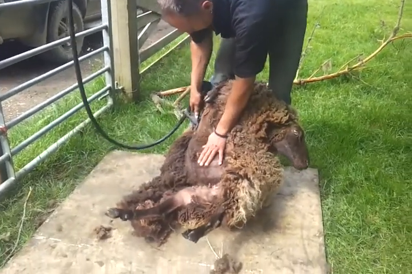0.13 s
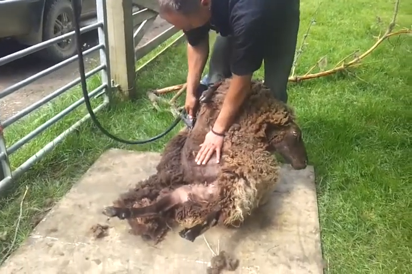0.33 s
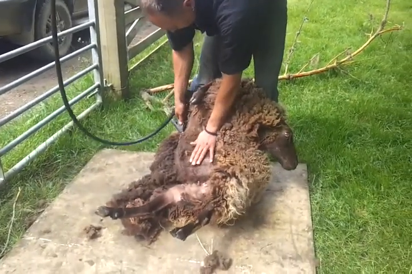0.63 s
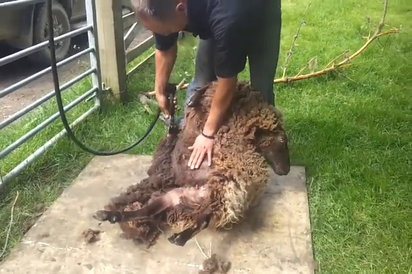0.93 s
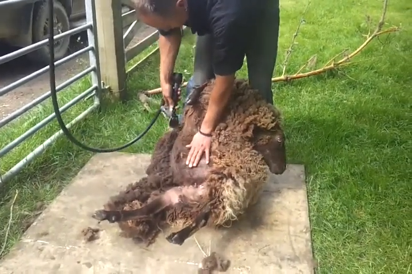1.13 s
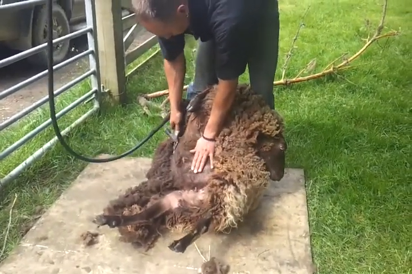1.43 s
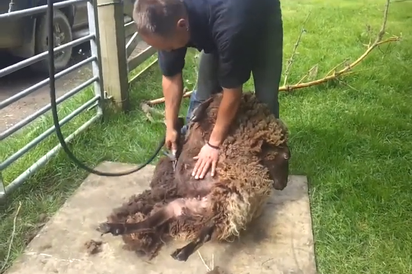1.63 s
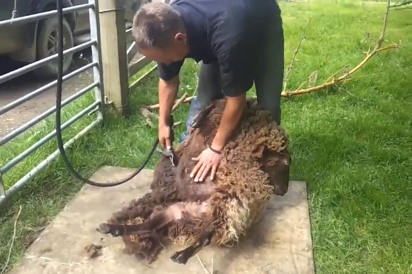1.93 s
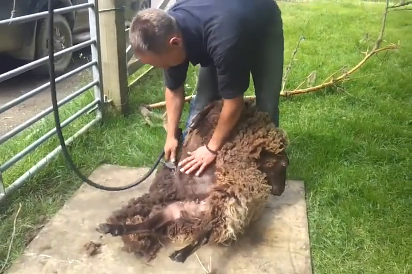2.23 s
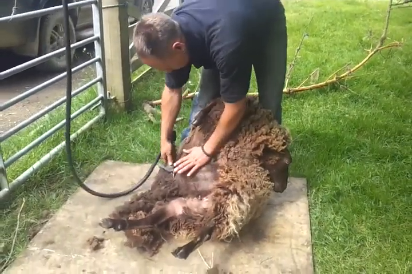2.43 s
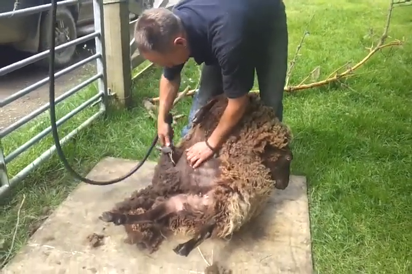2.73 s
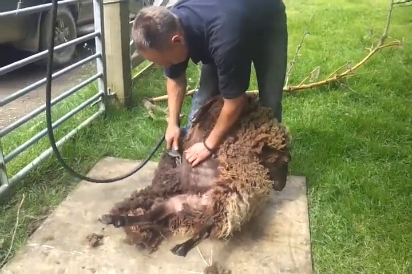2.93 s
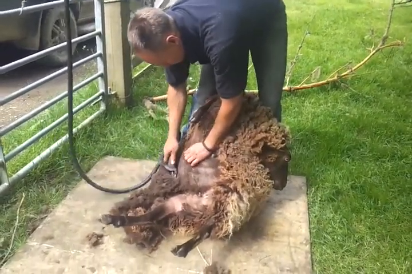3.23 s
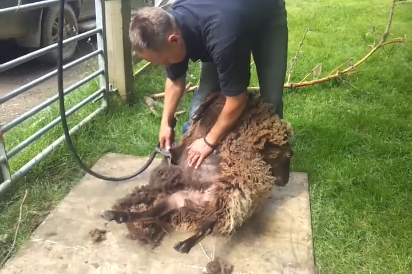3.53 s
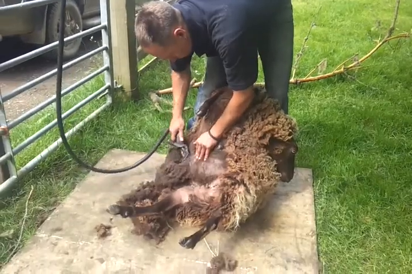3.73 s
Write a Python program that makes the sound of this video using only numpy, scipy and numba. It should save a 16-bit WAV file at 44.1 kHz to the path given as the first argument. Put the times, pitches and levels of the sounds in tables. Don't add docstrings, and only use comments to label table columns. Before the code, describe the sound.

A powered shearing handpiece buzzes nonstop a few metres away in an open paddock, harsh and metallic, with shifting ringing overtones, small jolts and brief low wind puffs on the stereo microphone.

```python
import sys
import numpy as np
from scipy import signal
from scipy.fft import rfft, irfft, next_fast_len
from scipy.io import wavfile
from scipy.ndimage import uniform_filter1d
from numba import njit

SR = 44100
rng = np.random.default_rng(int(sys.argv[2]) if len(sys.argv) > 2 else 0)


def volts_from_db(level):
    exponent = np.asarray(level, float) / 20
    return 10 ** exponent


def generate_wav(sig):
    pcm = np.round(np.clip(np.atleast_2d(sig).T, -1, 1) * 32767).astype(np.int16)
    wavfile.write(sys.argv[1], SR, pcm)


N = 170667
CRANK_HZ, FIRST_KNOCK_S, TEETH = 53.82, .0078, 8


def unit(x):
    return x / np.sqrt(np.mean(x ** 2))


def on_log(hz, table):
    table = np.array(table)
    return np.interp(np.log(np.maximum(hz, 1)), np.log(table[:, 0]), table[:, 1])


def shaped(x, gain):
    size = next_fast_len(N)
    hz = np.arange(size // 2 + 1) * SR / size
    return irfft(rfft(x, size) * gain(hz), size)[:N]


@njit
def resonator(x, hz, width):
    y, band, low = np.empty(len(x)), 0., 0.
    for i in range(len(x)):
        g, damping = np.tan(np.pi * hz[i] / 44100), width / hz[i]
        v = (band + g * (x[i] - low)) / (1 + g * (g + damping))
        band, low, y[i] = 2 * v - band, low + 2 * g * v, damping * v
    return y


def walk(rate_hz):
    hold = int(SR / rate_hz)
    steps = np.repeat(rng.standard_normal(N // hold + 1), hold)
    return 1.5 * uniform_filter1d(uniform_filter1d(steps, hold), hold)[:N]


def bursts(t, table):
    edge_s, gust_db = 0.0061, 2.5
    envelope = 0
    for start, length, db in table:
        inside = np.minimum(t - start, start + length - t)
        envelope = envelope + volts_from_db(db) * np.clip(inside / edge_s + .5, 0, 1)
    return rng.standard_normal(N) * envelope * volts_from_db(gust_db * walk(40))


# frequency_hz [Hz], density_db [dB per Hz]
WIND_COLOUR = [(20, -52), (70, -15.5), (184, -2.5), (300, -4.5), (374, -6), (450, -5), (700, -25),
               (1000, -55)]
# start_s [s], length_s [s], level_db [dB]
PUFFS_LEFT = [(.08, 0.096, -45), (.22, 0.18, -43.5), (.5, 0.31, -47), (.75, 0.079, -33.5),
              (.83, 0.062, -41), (.89, 0.17, -45.5), (1.2, 0.22, -49), (1.52, 0.039, -39),
              (1.68, 0.075, -47), (1.8, 0.14, -47), (2.27, 0.026, -51), (2.37, 0.059, -43),
              (3.41, 0.02, -42)]
# start_s [s], length_s [s], level_db [dB]
PUFFS_RIGHT = [(0.03, 0.29, -41), (0.35, 0.054, -34.5), (0.424, 0.18, -49.5), (0.573, 0.14, -38.5),
               (0.742, 0.15, -45), (0.8, 0.016, -34), (0.842, 0.0355, -31), (0.9, 0.13, -43.5),
               (1.177, 0.12, -39.5), (1.27, 0.062, -42), (1.344, 0.062, -45.5), (1.669, 0.04, -39.5),
               (1.749, 0.02, -32), (1.779, 0.22, -48), (2.097, 0.05, -46), (2.486, .06, -46),
               (2.614, .04, -53), (2.68, 0.08, -55), (3.033, 0.037, -51), (3.113, 0.085, -45.5),
               (3.39, 0.018, -48), (3.707, 0.047, -44)]


def wind(t):
    breeze = (0, 4, -75)
    colour = lambda f: volts_from_db(on_log(f, WIND_COLOUR) + 32) / (1 + (f / 600) ** 6)
    return np.array([shaped(bursts(t, [*puffs, breeze]), colour) for puffs in (PUFFS_LEFT, PUFFS_RIGHT)])


# start_s [s], length_s [s], level_db [dB]
SHIFTS = [
    (2.419, 0.168, -34.5),
    (3.196, 0.16, -34.5),
    (3.353, 0.084, -39.5),
]


def board(t):
    board_hz, width_hz = 244, 180.
    x = bursts(t, SHIFTS)
    for _ in range(3):
        x = resonator(x, board_hz + 0 * t, width_hz)
    return volts_from_db(24.5) * x


def knocks(turn):
    mean_db, scatter_db, length_turns = -4, 3, 0.12
    size = volts_from_db(mean_db + scatter_db * rng.standard_normal(int(turn[-1]) + 3))
    nearest = np.round(turn)
    return size[nearest.astype(int)] * np.exp(-((turn - nearest) / length_turns) ** 2)


def grit():
    contact_db, repeat = 1.55, 0.22
    x = rng.standard_normal(N) * volts_from_db(contact_db * rng.exponential(size=N))
    lag = round(SR / CRANK_HZ)
    turns = np.pad(x, (0, -N % lag)).reshape(-1, lag)
    return unit(signal.lfilter([1], [1, -repeat], turns, axis=0).ravel()[:N])


# start_s [s], peak_db [dB]
JOLTS = [(1.089, -5), (1.881, -9), (1.989, -13), (2.084, -4), (2.141, -1.5), (2.518, -11), (3.217, -19),
         (3.32, -2), (3.386, -7), (3.405, -1), (3.642, -5), (3.696, -4)]


def jolts(t):
    rise_s = 0.0026
    return 1 + sum(volts_from_db(db + 0.5) * np.exp(-((t - start - rise_s) / rise_s) ** 2) for start, db in JOLTS)


# frequency_hz [Hz], width_hz [Hz], level_db [dB]
BARREL = [(252.6, 28, -8.5), (467, 74, -0.5), (554.4, 48, 3.5), (639.5, 47, 1.5), (718.4, 47, 2),
          (898, 52, 0), (1123, 98, -3.5), (1356, 40, -7), (1444, 37, -11.5), (1720, 136, -0.5)]


def barrel(t, knock):
    push = grit() * (knock + volts_from_db(-5))
    total = 0
    for k, (hz, width, db) in enumerate(BARREL):
        total = total + (-1) ** k * volts_from_db(db) * unit(resonator(push, hz + 0 * t, 1. * width))
    return unit(total)


# once_db [dB], once_peak_turns [turns], twice_db [dB], twice_peak_turns [turns]
THROB = [
    (1.15, 0.19, 1.1, 0.63),
    (4.8, 0.37, 4.5, 0.1),
    (3.5, .0, 1, 0.64),
    (4.6, 0.35, 0, .0),
    (2.5, 0, 3, 0.46),
    (2, 0.74, -0.5, 0),
]


def throbs(turn):
    teeth = 1 + .06 * np.cos(2 * np.pi * TEETH * turn)
    return [teeth * volts_from_db(once * np.cos(2 * np.pi * (turn - p)) + twice * np.cos(4 * np.pi * (turn - q)))
            for once, p, twice, q in THROB]


# frequency_hz [Hz], density_db [dB per Hz]
SCRAPE_COLOUR = [(240, -19), (350, -34), (600, -15.5), (2000, -12.5), (3400, -7.5), (6600, -8),
                 (12500, -11), (14500, -20.5)]


def scrape(throb):
    return unit(shaped(grit() * throb, lambda f: volts_from_db(on_log(f, SCRAPE_COLOUR))))


def ring(t, x, hz, width_hz):
    hz = hz + 0 * t
    return unit(resonator(resonator(x, hz, width_hz), hz, width_hz))


def blade_rings(t, throb, hold, sway):
    comb_hz, comb_db, fork_db, cutter_db, heel_db, tip_db, grip_db = hold
    _, comb_throb, fork_throb, cutter_throb, tip_throb, grip_throb = throb
    blade = grit()
    comb = ring(t, blade * comb_throb ** 1.6, comb_hz, 330.)
    heel = ring(t, blade * comb_throb, 2627, 490.)
    grip = ring(t, blade * grip_throb, 1600, 510.)
    fork_hz = 5160 - 350 * np.clip((t - 3.4) / .3, 0, 1)
    patchy_db = 1.6
    fork_level = volts_from_db(-15.5 + fork_db + sway[2] + patchy_db * walk(6.9))
    fork = ring(t, blade * fork_throb, fork_hz, 700.)
    cutter = ring(t, blade * cutter_throb, 6840 * (1 + 0.024 * walk(2.83)), 1300.)
    tip_level = volts_from_db(-12.5 + tip_db + sway[4] + patchy_db * walk(20))
    tips = ring(t, blade * tip_throb, 7940 * (1 + 0.026 * walk(3.9)), 700.)
    return (volts_from_db(-10.5 + comb_db + sway[1]) * comb
            - volts_from_db(-18 + heel_db + sway[1]) * heel
            + volts_from_db(-25 + grip_db + sway[2]) * grip
            - fork_level * fork
            + volts_from_db(-13 + cutter_db + sway[3]) * cutter
            + tip_level * tips)


# comb_db, fork_db, cutter_db, heel_db, tip_db, grip_db
HAND = [(0, -19.5, 2880, -5, -9, 5, 5, 6, -14), (.2, -20.5, 2930, 2, -7, 6, -2, 3, 11.5),
        (.42, -19.5, 2900, 2.5, -2, 8, 1, 6.5, 12), (.65, -20.5, 3120, 0.5, 0, 8, 2, -3, 7),
        (.82, -19.5, 3260, 3.5, -3, -3, 5, 0, 6), (1.05, -19.5, 3270, -1.5, 6.5, 8, -1, -4, 0),
        (1.25, -20.5, 3220, 5, 3, 3.5, 8, -2, 2), (1.45, -20, 3160, 4, -12, 0, 8, 0.5, 8),
        (1.75, -19, 3250, -1, -3, 3, 2, -2, -8), (2.0, -20.5, 3230, -5.5, 0, 1, -7, 2, -2),
        (2.3, -19.5, 3180, -9, -5, -7, -5, 3, -7), (2.41, -22, 3220, -7, 3, 2, -3, 0, 3),
        (2.5, -18.5, 3180, -11, 3, -6, 2, 6, -5), (2.68, -21, 3180, 1, -2, -7, 2.5, 6, -19),
        (2.8, -20, 3300, -13, -8, -3, -14, 0, 1), (3.05, -20, 3330, -19, 8, 4, -11, -1, -10),
        (3.3, -20, 3320, -9, 3.5, -8, -10, -1, 10), (3.55, -19.5, 3260, -12, 0, 8, -5, 3, -1),
        (3.7, -19.5, 3340, -13, 8.5, -8, 0, 1, -11), (3.87, -19, 3340, -13, 6.5, -13, 1, 1, 1)]


def handpiece(t, turn, knock, sway):
    times, *columns = np.array(HAND).T
    level_db, *hold = [np.interp(t, times, column) for column in columns]
    throb = throbs(turn)
    steel = scrape(throb[0]) * volts_from_db(sway[0]) + blade_rings(t, throb, hold, sway)
    barrel_level = volts_from_db(-9 - 20.5 + 0.3 * (level_db + 21))
    effort = jolts(t)
    return volts_from_db(level_db) * effort * steel + barrel_level * effort ** 1.69 * barrel(t, knock)


# frequency_hz [Hz], difference_db [dB]
LEAN = [(300, 0), (1300, -0.5), (2400, 1), (4400, 4), (6400, 11), (8200, 5), (9300, 2.5), (13000, -5)]
# frequency_hz [Hz], share [0-1]
COMMON = [(300, 0.81), (700, 0.88), (1200, 0.54), (2000, 0.42), (3000, 0.81), (5500, 0.63), (7800, 0.21),
          (12000, 0.4)]


def hollow(f):
    notch = 1 - 0.35 * np.exp(-((f - 343) / 30) ** 2)
    return notch / (1 + (215 / (f + 1)) ** 14)


def at_ports(common, left, right):
    lag_s, left_top_hz = 6.5e-5, 13170
    share = lambda f: np.clip(on_log(f, COMMON), 0, 1)
    ports = []
    for side, own in ((0.91, left), (-0.7, right)):
        roll_off = lambda f: 1 + (side > 0) * (f / left_top_hz) ** 60
        lean = lambda f: volts_from_db(side * on_log(f, LEAN) / 2) / roll_off(f) * hollow(f)
        late = lambda f: np.exp(-1j * np.pi * f * side * lag_s)
        direct = shaped(common, lambda f: lean(f) * late(f) * np.sqrt(share(f)))
        scattered = shaped(own, lambda f: lean(f) * np.sqrt(1 - share(f)))
        ports.append(direct + scattered)
    return np.array(ports)


def scene():
    t = np.arange(N) / SR
    turn = (t - FIRST_KNOCK_S) * CRANK_HZ + 1
    knock = knocks(turn + 0.087) + volts_from_db(-5) * knocks(turn + 1 - 0.646)
    flicker_db = .3 * walk(30.24)
    sway = [flicker_db + .6 * walk(10.02) for _ in range(5)]
    common, left, right = (handpiece(t, turn, knock, sway) for _ in range(3))
    return volts_from_db(1.5) * at_ports(common, left, right) + wind(t) + board(t)


def band_limit(x):
    return signal.sosfilt(signal.butter(12, 15710, fs=SR, output="sos"), x)


def record(dry):
    headroom, top_hz = .93, 14550
    soft = dry / (1 + (dry / headroom) ** 6) ** (1 / 6)
    low_pass = signal.ellip(8, .2, 70, top_hz, fs=SR, output="sos")
    return band_limit(signal.sosfilt(low_pass, soft))


dry = scene()
out = record(dry)
generate_wav(out)
```